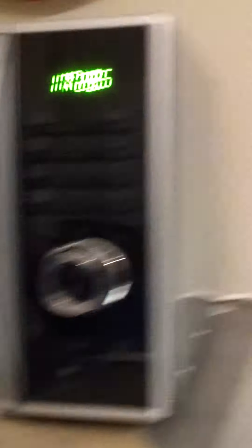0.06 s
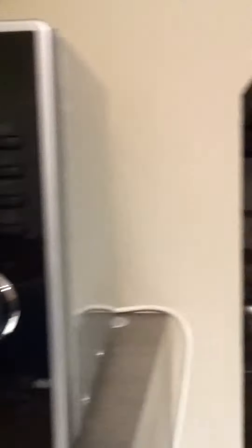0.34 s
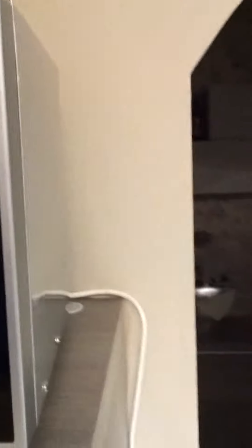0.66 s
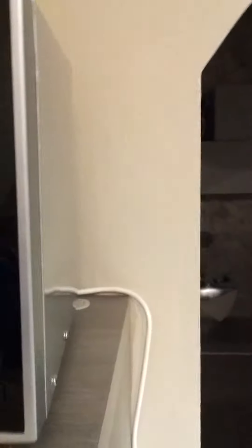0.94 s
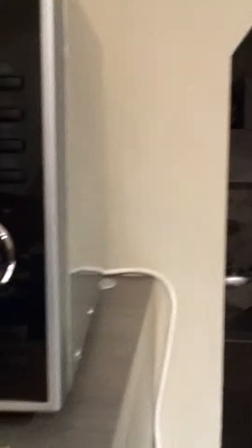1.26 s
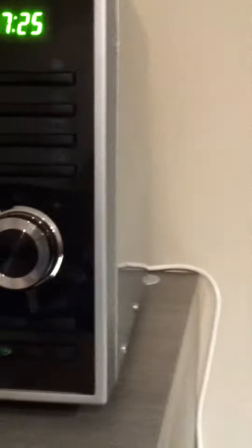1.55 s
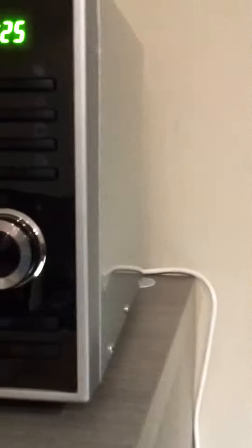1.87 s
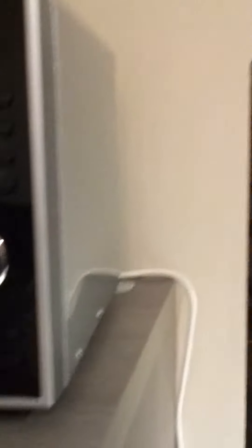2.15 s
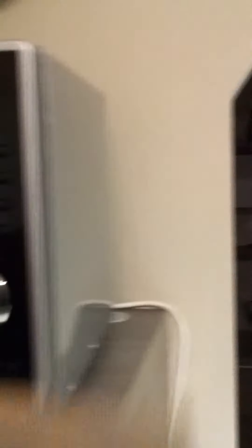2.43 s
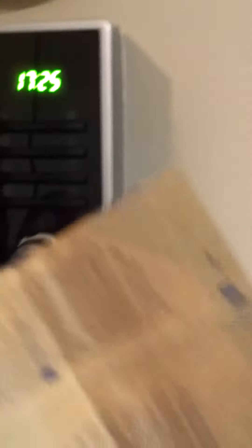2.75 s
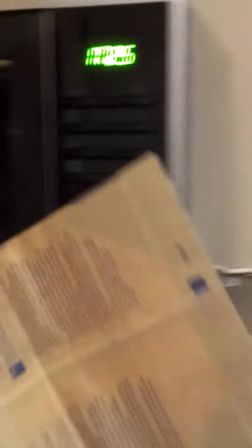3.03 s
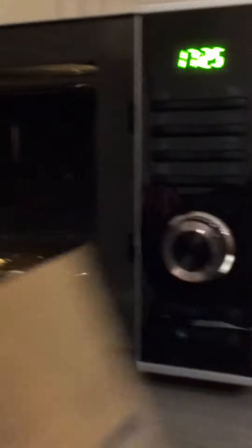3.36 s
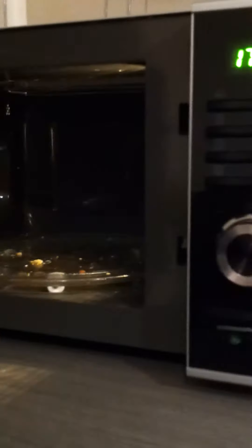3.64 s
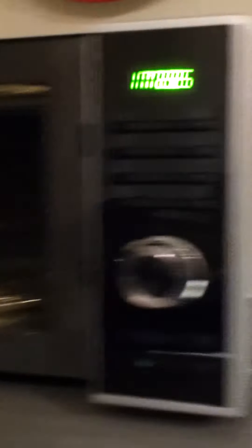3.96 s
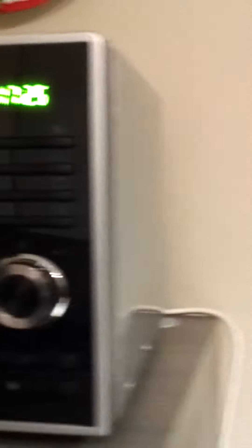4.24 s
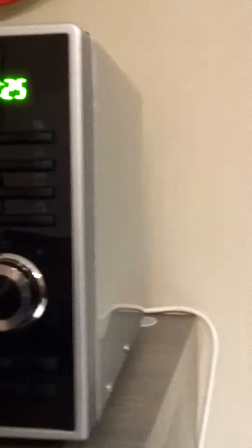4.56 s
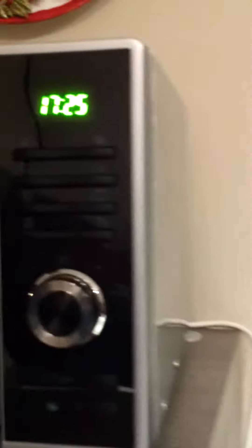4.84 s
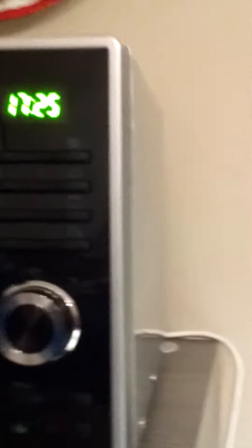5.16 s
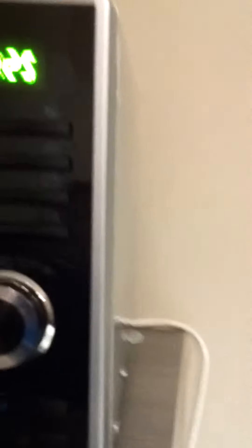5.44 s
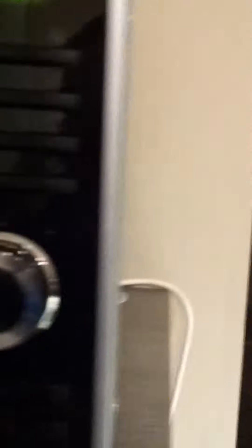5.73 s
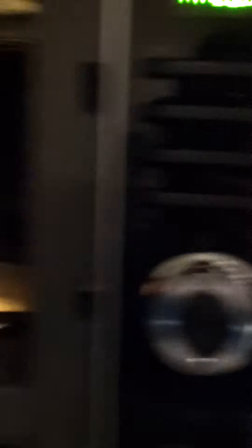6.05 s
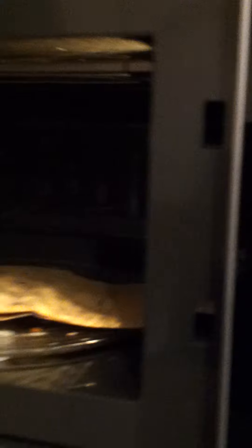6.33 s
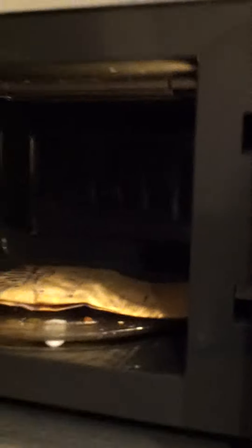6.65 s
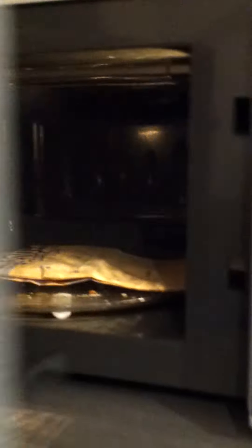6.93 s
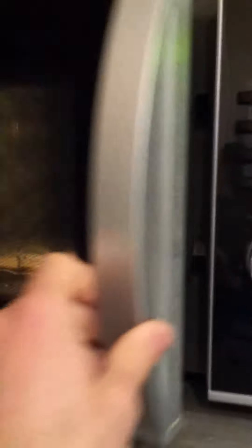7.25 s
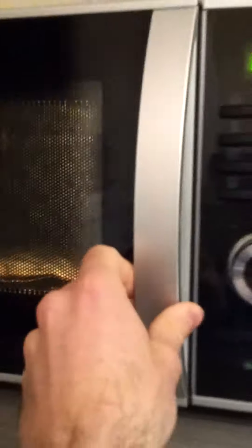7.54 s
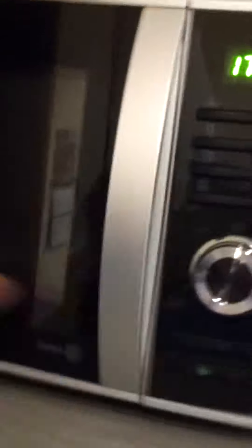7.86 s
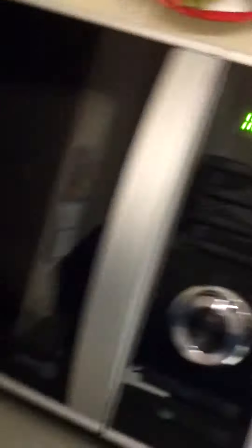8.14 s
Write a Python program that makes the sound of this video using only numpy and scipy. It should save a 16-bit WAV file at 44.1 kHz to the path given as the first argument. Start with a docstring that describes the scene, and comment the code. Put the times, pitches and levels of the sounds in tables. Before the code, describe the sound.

In a small, hard-walled kitchen with a low appliance hum, a microwave door unlatches with clicks and a ringing metal clunk. A paper popcorn bag is slid about and handled, crinkling and snapping, followed by a few faint taps and ticks. The bag is pushed inside, the glass turntable knocks and rings, and the door slams shut close to the microphone.

```python
"""A low appliance hum runs in a small, hard-walled kitchen. At 0.4 s a hand bumps a microwave's handle;
the door unlatches and jumps free, ringing the steel case. From 1 s a paper popcorn bag is slid about and
handled: a stream of tiny buckles, with snapping creases, then a few taps and ticks. At 5.3 s the bag is
pushed inside, and near 6 s the glass turntable knocks on its support and rings. At 7.6 s the door slams
with a puff of air and thuds back."""
import sys
import numpy as np
from scipy import signal
from scipy.fft import rfft, irfft
from scipy.io import wavfile

SR = 44100
rng = np.random.default_rng(int(sys.argv[2]) if len(sys.argv) > 2 else 0)


def wav_out(sig):
    """Save sig, one row per channel (or a flat mono array), as 16-bit PCM at SR to the path in sys.argv[1]."""
    wavfile.write(sys.argv[1], SR, np.round(np.clip(np.atleast_2d(sig).T, -1, 1) * 32767).astype(np.int16))


N = 365588
TIME = np.arange(N) / SR


# door jumps free, rebounds, meets the hooks, slams: t/s, level/dB, brightness/dB, shiver t60/s
DOOR_BLOWS = [(0.681, -46.5, 6, .14), (0.863, -18.5, -0.5, 0.068), (0.869, -19.5, 9, 0.042),
              (0.891, -18.5, 4, 0.17), (7.458, -32, -3.5, 0.16), (7.542, -24, -0.5, 0.15),
              (7.610, -13.5, 0.5, 0.05), (7.616, -17, -11.5, 0.051), (7.785, -36.5, -16.5, 0.047)]
# a hand bumps the handle, latch hooks click and scrape, the door thuds back after the slam:
# t/s, level/dB, brightness/dB, shiver t60/s
LIGHT_DOOR_BLOWS = [(0.439, -49.5, -2, 0.077), (0.718, -44, 3, .049), (0.736, -31.5, 7.5, 0.033),
                    (0.757, -33, 3, 0.24), (0.823, -32, 11, 0.05), (0.832, -27.5, 9.5, 0.24),
                    (0.879, -35, 3, 0.019), (7.506, -38, 3, 0.11), (7.590, -27, 5, 0.44),
                    (7.638, -22, -7.5, 0.089)]
# steel case and door: f/Hz, level/dB, t60/s
STEEL_MODES = [(136.6, -11.5, 0.5), (240, 5.5, 0.078), (300.5, 2.5, 0.26), (349, -33, 0.29),
               (582.6, 0, 0.093), (647, 7, 0.063), (805, -16, 0.34), (1484, 3, 0.044), (1620, -3, 0.17),
               (1835, 5, 0.15), (2330, -16, 0.088)]
# f/Hz, level/dB
STEEL_EQ = [(110, -12), (260, -4.5), (620, -8), (1000, -9.5), (1800, -14.5), (3200, -12.5), (5200, -9),
            (7200, -3), (9500, -14), (14000, -21)]

def door():
    """Blows from hand, latch hooks and door ring the steel case."""
    panel = blows(DOOR_BLOWS, STEEL_EQ, contact_s=0.0007, bass_hold=2.2, mid_db=9.5, pan_db=2.5,
                  modes=STEEL_MODES, modes_db=-22)
    light = blows(LIGHT_DOOR_BLOWS, STEEL_EQ, contact_s=0.00017, bass_hold=0.54, mid_db=1.5, pan_db=0.6,
                  modes=STEEL_MODES, modes_db=-28)
    return panel + light


def blows(table, eq, contact_s, bass_hold, mid_db, pan_db, modes=(), modes_db=0):
    """Impacts: a dense shiver plus any lasting modes. Harder contact trades bass for treble."""
    track, t = np.zeros((2, N)), np.arange(SR // 2) / SR
    bass_edge_hz, treble_edge_hz = 500, 2500
    attack = int(.025 * SR)
    ringing = [undb(db + modes_db) * fade(t, t60_s) * np.sin(2 * np.pi * hz * t)
               for hz, db, t60_s in modes]
    contact = 1 - np.exp(-t / contact_s)
    for start_s, level_db, bright_db, t60_s in table:
        shiver = unit(irfft(diffuse(len(t), apart_hz=8700), len(t)))
        ring = sum(rng.choice([-1, 1]) * mode for mode in ringing)  # contact point sets the sign
        # long bending waves decay at their own rate
        lower = colour(contact * (shiver * fade(t, t60_s * bass_hold) + ring), eq)
        upper = colour(contact * (shiver * fade(t, t60_s) + ring), eq)
        bass = band(lower, [125, bass_edge_hz], "bandpass", order=4)
        mid = band(upper, [bass_edge_hz, treble_edge_hz], "bandpass")
        treble = band(upper, treble_edge_hz, "highpass")
        parts = ((bass, -mid_db - bright_db), (mid, 0), (treble, -mid_db + bright_db))
        sound = sum(part * undb(level_db + db) / np.std(part[:, :attack]) for part, db in parts)
        add(track, start_s, pan(sound, pan_db))
    return track


# t/s, peak level/dB
AIR_PUFFS = [(.87, -45), (7.613, -34)]

def puffs(width_s=0.0073):
    """The door shoves air: one push and pull of pressure."""
    return sum(undb(db) * (s - TIME) / width_s * np.exp(.5 - .5 * ((TIME - s) / width_s) ** 2)
               for s, db in AIR_PUFFS)


# full speed at t/s, hold/s, paper hiss/dB, hollow body/dB
HANDLING_STROKES = [(0.0, 0.048, -48.5, -49.5), (1.05, 0.2, -35.5, -42.5), (1.26, 0.082, -35, -40),
                    (1.37, 0.045, -38, -47.5), (1.875, 0.036, -43.5, -52.5), (1.942, 0.32, -37, -45),
                    (2.183, 0.0016, -16.5, -33), (2.423, 0.0047, -38.5, -44), (2.53, 0.012, -40, -48),
                    (2.622, 0.0023, -46, -67), (2.76, 0.13, -55.5, -59), (2.875, 0.092, -51, -51.5),
                    (3.903, 0.0027, -44, -46)]
# f/Hz, level/dB
PAPER_EQ = [(150, -17), (330, -1), (520, -5.5), (750, -9), (3200, -12.5), (6000, -8), (6900, -1.5),
            (8200, -3), (9700, -12), (14000, -15)]

def bag_handling():
    """The bag is brushed, dragged, lifted and turned in the open."""
    paper = rustle(HANDLING_STROKES, PAPER_EQ,
                   buckles_per_s=1400, scatter_db=2.5, rub_db=2.5, flutter_db=2.9)
    return pan(paper, db=1.9)


# full speed at t/s, hold/s, paper hiss/dB, hollow body/dB
LOADING_STROKES = [(5.28, 0.026, -54, -54), (5.42, 0.027, -52.5, -57), (5.547, .004, -29, -36),
                   (5.58, 0.076, -42.5, -40.5), (5.689, 0.0093, -30, -40.5), (5.82, 0.043, -38.5, -42.5)]
# f/Hz, level/dB
OVEN_EQ = [(150, -27), (300, -7), (1000, -5.5), (2200, -14), (5000, -10.5), (8000, -9), (12000, -20.5)]

def bag_loading():
    """The bag is brought up and pushed into the oven."""
    paper = rustle(LOADING_STROKES, OVEN_EQ,
                   buckles_per_s=1000, scatter_db=5.0, rub_db=-2.5, flutter_db=3.5)
    return pan(paper, db=0.79)


def rustle(strokes, eq, buckles_per_s, scatter_db, rub_db, flutter_db):
    """Fibres catch and buckle in uneven clicks over a smooth rub; the hollow bag gives the lows."""
    track = np.zeros((2, N))
    swell_db_per_s, release_db_per_s = 468, 340
    for start_s, hold_s, hiss_db, body_db in strokes:
        on = (TIME > start_s - .15) & (TIME < start_s + .65)
        t = TIME[on]
        swell_db = -swell_db_per_s * np.maximum(start_s - t, 0)
        release_db = -release_db_per_s * np.maximum(t - start_s - hold_s, 0)
        clicks = (rng.random(len(t)) < buckles_per_s / SR) * rng.choice([-1, 1], len(t))
        sizes = undb(scatter_db * np.minimum(rng.exponential(size=len(t)), 5))
        friction = unit(clicks * sizes) + undb(rub_db) * rng.standard_normal((2, len(t)))
        paper = colour(friction * undb(flutter_db * walk(70)[on]), eq)
        hiss = unit(band(paper, 2100, "highpass")) * undb(hiss_db)
        body = unit(band(paper, [190, 2100], "bandpass")) * undb(body_db)
        add(track, t[0], (hiss + body) * undb(swell_db + release_db))
    return track


# t/s, level/dB, brightness/dB, shiver t60/s
TURNTABLE_KNOCKS = [(5.865, -39, -14, 0.036), (5.978, -23, 6.5, 0.13), (6.007, -34.5, -4.5, 0.062)]
# f/Hz, level/dB, t60/s
TURNTABLE_MODES = [(278, -4, 0.25), (417, -1, 0.31), (661.4, 9.5, 0.21), (2640, -7.5, 0.3),
                   (6020, 13.5, 0.063), (7840, 11, 0.065)]
# f/Hz, level/dB
GLASS_EQ = [(700, -2.5), (1500, -4.5), (8000, -1.5), (14000, -17.5)]

def turntable():
    """The glass plate knocks on its support, rebounds and rings."""
    return blows(TURNTABLE_KNOCKS, GLASS_EQ, contact_s=0.0016, bass_hold=0.64, mid_db=9.0, pan_db=1.0,
                 modes=TURNTABLE_MODES, modes_db=-16.5)


# t/s, level/dB, brightness/dB
BAG_SNAPS = [(2.298, -40, 5), (2.505, -39, 14.5), (2.595, -39.5, 10.5), (2.74, -51, 10), (2.854, -45, 8),
             (5.47, -53.5, 6), (5.52, -41, 13), (5.568, -38.5, -5), (5.615, -44.5, -3), (5.695, -34, 1),
             (5.722, -40.5, 9.5)]
# snaps, taps and ticks: f/Hz, level/dB
SMALL_BLOW_EQ = [(150, -20.5), (500, 0), (1300, -6.5), (2700, -14), (5500, -8.5), (8200, -6),
                 (10500, -19.5)]

def snaps(t60_s=0.034):
    """Creases snap and the bag hits the oven floor."""
    hits = [(*row, t60_s) for row in BAG_SNAPS]
    return blows(hits, SMALL_BLOW_EQ, contact_s=0.00017, bass_hold=5.7, mid_db=12, pan_db=1.0)


# t/s, level/dB, brightness/dB
DULL_TAPS = [(3.474, -48, -4.5), (3.947, -53, -2), (6.528, -50, 4)]

def taps(t60_s=0.06):
    """Dull taps on door and counter."""
    hits = [(*row, t60_s) for row in DULL_TAPS]
    return blows(hits, SMALL_BLOW_EQ, contact_s=0.00034, bass_hold=2.6, mid_db=-1.7, pan_db=1.5)


# t/s, level/dB, brightness/dB
DRY_TICKS = [(0.661, -57.5, 17), (1.859, -64, 13.5), (4.809, -54, 14), (4.844, -46, 11), (6.235, -47.5, 13)]

def ticks(t60_s=0.0057):
    """Small dry ticks, to the left."""
    hits = [(*row, t60_s) for row in DRY_TICKS]
    return blows(hits, SMALL_BLOW_EQ, contact_s=0.00024, bass_hold=7.8, mid_db=1.4, pan_db=7.0)


# f/Hz, t60/s
ROOM_DECAY = [(150, 0.94), (400, 0.63), (1200, 0.67), (3000, 0.59), (7000, 0.36), (14000, 0.35)]

def kitchen(early_db=6, early_t60_s=0.036, gap_s=0.001):
    """Room response: quick returns from counter and wall, then a tail that dulls as it dies."""
    t = np.arange(SR) / SR
    noise = diffuse(SR, apart_hz=1300)
    octave = np.log2(np.clip(np.fft.rfftfreq(SR, 1 / SR), 125, 16000))
    early = undb(early_db) * fade(t, early_t60_s)
    response = 0
    for hz in 125 * 2 ** np.arange(8):
        share = np.maximum(1 - abs(octave - np.log2(hz)), 0)
        response += irfft(noise * share, SR) * (early + fade(t, along(ROOM_DECAY, hz)))
    return unit(response * (t > gap_s)) / np.sqrt(SR)


# f/Hz, rms level/dB
HUM_TONES = [(156, -70.5), (185, -64), (333, -65), (431, -62.5), (667, -71)]
# f/Hz, level/dB
ROOM_NOISE_EQ = [(25, -26.5), (95, -18), (135, -7.5), (190, -3), (400, -12.5), (750, -15), (1900, -22),
                 (4500, -27), (14000, -28)]

def background(noise_db=-52.46):
    """Wavering hum of a running appliance over low room noise and faint hiss."""
    gain = undb(along(ROOM_NOISE_EQ, np.fft.rfftfreq(N, 1 / SR)))
    air = unit(irfft(diffuse(N, apart_hz=1100) * gain, N))
    hum = sum(undb(db + 2 * walk(9)) * np.sqrt(2) * np.sin(2 * np.pi * hz * TIME + .8 * walk(14))
              for hz, db in HUM_TONES)
    return hum + air * undb(noise_db + .5 * walk(3.6))


def undb(db):
    """Decibels to gain."""
    return 10 ** (np.asarray(db) / 20)


def unit(x):
    """Scale to rms 1."""
    return x / np.sqrt(np.mean(x ** 2) + 1e-18)


def fade(t, t60_s):
    """Exponential decay, 60 dB in t60_s."""
    return np.exp(-np.log(1000) * t / t60_s)


def along(points, hz):
    """Interpolate (f/Hz, value) points on a log-frequency axis."""
    f, value = np.transpose(points)
    return np.interp(np.log(np.maximum(hz, 1)), np.log(f), value)


def colour(x, eq, size=2048):
    """Minimum-phase EQ on stereo x, via the cepstrum."""
    gain = undb(along(eq, np.fft.rfftfreq(size, 1 / SR)))
    cepstrum = irfft(np.log(gain))
    cepstrum[1:size // 2] *= 2
    cepstrum[size // 2 + 1:] = 0
    impulse = irfft(np.exp(rfft(cepstrum)))
    return signal.oaconvolve(x, impulse[None], axes=1)[:, :x.shape[1]]


def band(x, hz, kind, order=3):
    """Butterworth filter."""
    return signal.sosfilt(signal.butter(order, hz, kind, fs=SR, output="sos"), x)


def walk(rate_hz):
    """Smooth random drift, spread near 1."""
    knots = rng.standard_normal(4096)
    return np.interp(TIME * rate_hz, np.arange(len(knots)), knots)


def diffuse(size, apart_hz):
    """Stereo noise spectra: channels alike in the bass, unrelated above apart_hz."""
    mid, side = rfft(rng.standard_normal((2, size)))
    width = np.minimum(np.fft.rfftfreq(size, 1 / SR) / apart_hz, 1) ** 0.45
    return (mid + np.outer([1, -1], width * side)) / np.sqrt(1 + width ** 2)


def add(track, start_s, sound):
    """Mix in a stereo sound."""
    start = int(start_s * SR)
    track[:, start:start + sound.shape[1]] += sound[:, :N - start]


def pan(x, db):
    """Left over right by db."""
    return undb([[db / 2], [-db / 2]]) * x


def place(x, room, direct_db, room_db):
    """Direct path plus reverberation."""
    return undb(direct_db) * x + undb(room_db) * signal.oaconvolve(x, room, axes=1)[:, :N]


def scene():
    """Door, turntable and bag in one kitchen."""
    room = kitchen()
    return (place(door(), room, direct_db=0.0, room_db=-2.0)
            + place(turntable(), room, direct_db=0.5, room_db=-7)
            + place(snaps() + taps(), room, direct_db=1.0, room_db=0.0)
            + place(ticks(), room, direct_db=0.5, room_db=-2.0)
            + place(bag_handling(), room, direct_db=1.0, room_db=-1.5)
            + place(bag_loading(), room, direct_db=-6.5, room_db=1.6)
            + puffs() + background())


def record(dry):
    """The slam overloads the microphone; low-pass at 14.7 kHz."""
    lowpass = signal.ellip(10, .2, 70, 14700, fs=SR, output="sos")
    return signal.sosfilt(lowpass, np.clip(dry, -1, 1))


dry = scene()
out = record(dry)
wav_out(out)
```